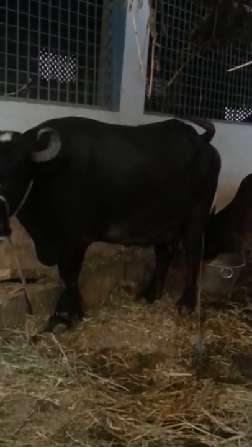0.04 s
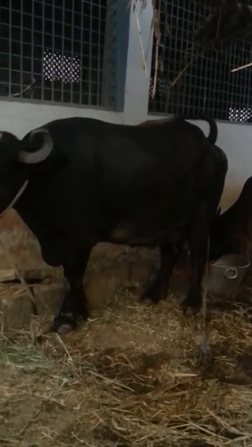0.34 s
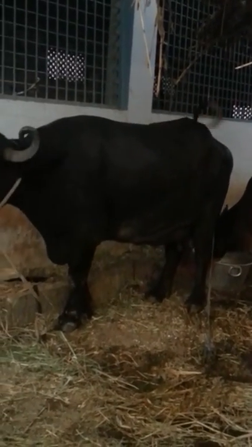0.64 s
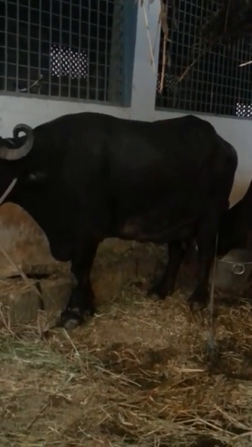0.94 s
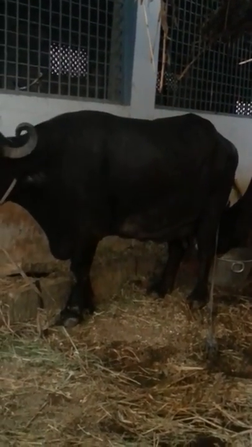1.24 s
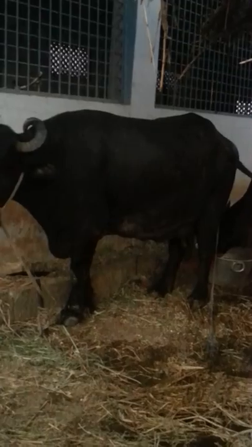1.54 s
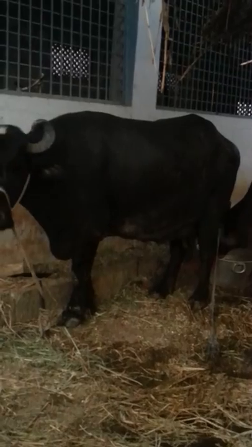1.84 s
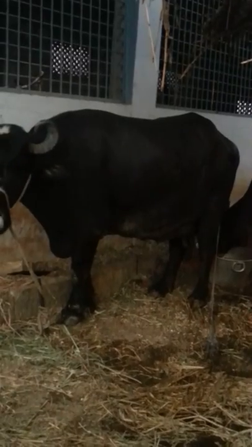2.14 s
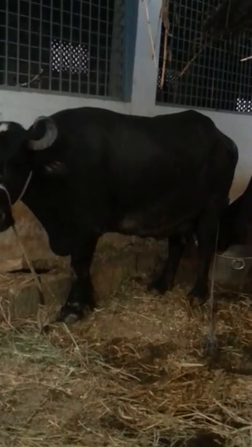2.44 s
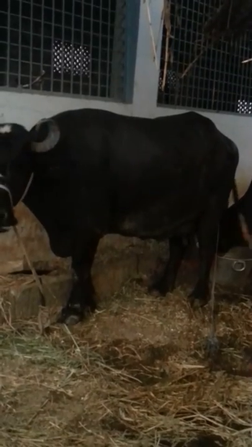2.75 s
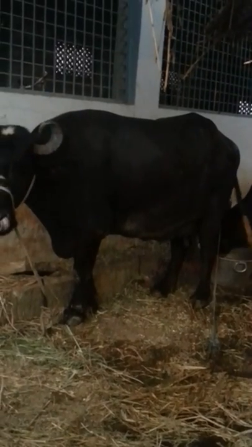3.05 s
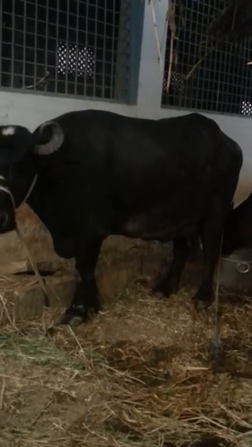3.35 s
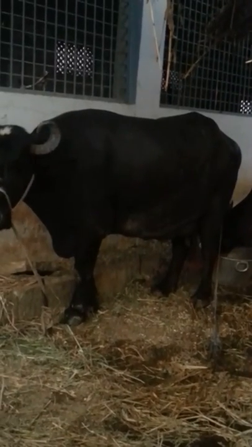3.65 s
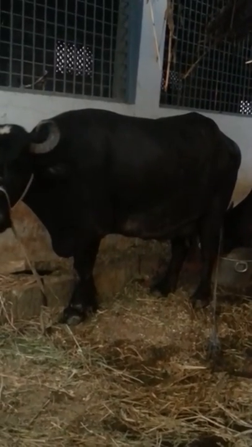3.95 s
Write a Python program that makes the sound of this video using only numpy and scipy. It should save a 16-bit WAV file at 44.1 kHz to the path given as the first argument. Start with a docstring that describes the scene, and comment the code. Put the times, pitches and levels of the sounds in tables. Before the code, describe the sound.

Small birds, probably sparrows, chatter throughout in an echoing cattle shed, mostly to the left, near chirps standing out of the crowd and fading after 3.6 seconds. A low rumble, faint hum and hiss lie beneath. Soft scuffing comes around 0.5 seconds, and a hollow knock at 2.1. Seven sharp electrical pops hit the right side between 0.3 and 1.3 seconds, with another at 3.5.

```python
"""Birds in a cattle shed

A flock of small birds, probably sparrows, chatters between hard walls, mostly to the left.
Each chirp is a short, bending whistle; near ones stand out of the echoing crowd.
Under them lie a low rumble, a faint hum and hiss, some scuffing and one hollow knock.
Eight sharp electrical pops, sudden steps in voltage, hit the right channel only."""
import sys
import numpy as np
from scipy import signal
from scipy.fft import rfft, irfft, next_fast_len
from scipy.io import wavfile
from scipy.ndimage import uniform_filter1d, map_coordinates

SR = 44100
rng = np.random.default_rng(int(sys.argv[2]) if len(sys.argv) > 2 else 0)


def persist_wave(psi):
    """Save psi, clipped to +-1, as 16-bit WAV."""
    counts = np.round(np.clip(psi, -1, 1) * 32767).astype(np.int16)
    wavfile.write(sys.argv[1], SR, np.atleast_2d(counts).T)


N = 176400  # 4 seconds

# how long the shed's echo takes to fade by 60 dB: f/Hz, fade time/s
ECHO_FADE = [(300, 0.08), (2000, 0.41), (5000, 0.34), (10000, 0.13)]
# tone of the rumble: f/Hz, relative level/dB
RUMBLE_TONE = [(20, -23), (40, -12), (75, -9), (130, -3.5), (220, -1.5), (290, 1.5), (450, -6.5),
               (700, -10.5), (1200, -13.5), (2500, -13.5), (6000, -88)]
# how the rumble swells and sinks: t/s, relative level/dB
RUMBLE_SWELL = [(0.0, -44), (0.46, -44.5), (1.51, -51), (2.37, -48), (4.0, -49.5)]
# how alike the rumble is left and right: f/Hz, likeness (1 = the same)
RUMBLE_LIKENESS = [(60, 0.66), (250, 0.93), (700, 0.44), (2000, 0.16)]
# notes of the hum: f/Hz, level/dB
HUM_NOTES = [(75.4, -63.5), (220.7, -56), (286, -60), (322, -60.5)]
# tone of the hiss: f/Hz, relative level/dB
HISS_TONE = [(2000, -37), (5000, -2.5), (8000, -4), (10000, -9.5), (13000, -22.5), (14500, -41),
             (15600, -45)]
# taps and scrapes on the floor: t/s, rise/s, 60 dB fade/s, level/dB, f/Hz, Q (high = squeaky)
FLOOR_SCUFFS = [(0, 0.037, 0.91, -45, 620, 8), (0.459, 0.042, 0.81, -42.5, 350, 0.32),
                (.48, 0.035, 1, -41.5, 780, 1.9), (.5, .09, .5, -46, 953, 36),
                (2.076, .001, 0.028, -38.5, 1900, 0.97), (2.077, 0.0034, 0.23, -38, 680, 1.6),
                (2.85, 0.0065, 0.19, -43.5, 660, 1.3), (3.762, 0.0034, 0.056, -44.5, 1430, 1.6)]
# ringing notes of the hollow knock: f/Hz, relative level/dB, 60 dB fade/s
KNOCK_NOTES = [(394, -2, 0.11), (770, 5.5, 0.061), (867, -0.5, .08)]
# voltage steps behind the pops: t/s, level before filtering/dB
VOLTAGE_STEPS = [(0.3452, -7), (0.7073, -8.5), (0.8734, -6.5), (1.0471, -10.5), (1.0792, -6.5),
                 (1.2356, -3.5), (1.2840, -5), (3.4515, -2.5)]
# how the crowd and the far birds swell and sink together: t/s, relative level/dB
FLOCK_SWELL = [(0.0, -27.5), (0.12, -31.5), (0.29, -25.5), (0.34, -26), (0.7, -26), (0.76, -32.5),
               (0.9, -28), (1.11, -25), (1.28, -32.5), (1.32, -23.5), (1.59, -29), (1.65, -30),
               (1.69, -28.5), (1.95, -35), (1.97, -31), (2.06, -33), (2.18, -26.5), (2.22, -32.5),
               (2.32, -26), (2.36, -30.5), (2.87, -25), (2.97, -31), (3.2, -31.5), (3.28, -32.5),
               (3.41, -30.5), (3.49, -26.5), (3.67, -37), (4.0, -40.5)]
# tone of the far birds: f/Hz, relative level/dB
FAR_TONE = [(590, -58), (1000, -69), (1390, -19), (1940, -9), (2260, -13), (2530, -12), (3780, 2.5),
            (4920, -29.5), (5920, -10.5), (6710, -3), (7700, -6), (8250, -13.5), (13700, -41.5),
            (14800, -79), (15500, -88)]
# tone of the near and crowd chirps where the listener stands: f/Hz, gain/dB
CHIRP_TONE = [(1000, -18), (2500, -1), (3200, 1.5), (4000, 1.5), (5300, 5.5), (7500, 8.5), (9000, 3),
              (11000, -5), (14000, -21)]
# extra lean of all the birds to one side: f/Hz, left minus right/dB
BIRD_BALANCE = [(1000, 7), (2000, 7.5), (4000, 1), (5300, 1.5), (6300, 1), (7300, -9.5), (9000, -10),
                (12000, -19)]
# near chirps: t/s, length/s, opening f/Hz, middle f/Hz, closing f/Hz, relative level/dB,
# roughness (0 = a clean whistle)
NEAR_CHIRPS = [ (-.02, 0.066, 4800, 4000, 3440, -28, 0.76), (0.125, 0.015, 5540, 6500, 6700, -37, 0),
               (0.156, 0.037, 4770, 4900, 5000, -31.5, 0.54), (0.198, 0.03, 7400, 7000, 6000, -33.5, 0.94),
               (0.226, 0.062, 5600, 5600, 5170, -29, 0.72), (0.245, 0.034, 4900, 4520, 4300, -27.5, 0.68),
               (0.287, 0.027, 4270, 4570, 4800, -30, .2), (0.267, 0.038, 3950, 3930, 3980, -24, 0.5),
               (0.302, 0.056, 5200, 5110, 5080, -34.5, 0.08), (0.384, 0.019, 3810, 3686, 3340, -26.5, 0.01),
               (0.407, 0.11, 5550, 4770, 3320, -31, 1.25), (0.547, 0.052, 6500, 5170, 3930, -32.5, 0.62),
               (0.574, 0.084, 4673, 3770, 2740, -29.5, 0.87), (0.625, 0.038, 7400, 7570, 7320, -38, 0.4),
               (0.634, .11, 5310, 3936, 3420, -30.5, 0.82), (0.783, 0.073, 5400, 4195, 3410, -30.5, 1.19),
               (0.885, 0.022, 5390, 6200, 6680, -31.5, 0.65), (0.897, 0.039, 4650, 4740, 4490, -30.5, 0.9),
               (0.912, 0.028, 5590, 5570, 4900, -28.5, 0.56), (0.976, 0.021, 4770, 4950, 4870, -23.5, 1.1),
               (1.023, 0.02, 5230, 5950, 6140, -40, .7), (1.07, 0.027, 4860, 4900, 5000, -27, 0.1),
               (1.074, 0.087, 4610, 3756, 2970, -35, 0.65), (1.202, 0.044, 7950, 7170, 6650, -29, 0.38),
               (1.32, 0.058, 5600, 4640, 4560, -31.5, 0.77), (1.377, 0.16, 5400, 4000, 3720, -32, 0.88),
               (1.474, 0.04, 4850, 6710, 8440, -28, 0.62), (1.529, 0.018, 6500, 5580, 4500, -26, .4),
               (1.55, 0.042, 4330, 4026, 3900, -23, 0.22), (1.676, 0.045, 5580, 5260, 4500, -32.5, 0.98),
               (1.742, 0.058, 5200, 4010, 3440, -31, 0.63), (1.835, 0.038, 4920, 5140, 5220, -33, 0.69),
               (1.96, 0.024, 4280, 4480, 5070, -32.5, 0.1), (2.112, 0.046, 4400, 5200, 6300, -41, 0.54),
               (2.157, 0.029, 4830, 4790, 4850, -28.5, 0.04), (2.157, 0.025, 5200, 5100, 5150, -35, 0),
               (2.2, 0.057, 5050, 6230, 7660, -44.5, 0.47), (2.272, 0.059, 6000, 4920, 4210, -32.5, 0.74),
               (2.295, 0.022, 4880, 4970, 4980, -51, 0.17), (2.459, 0.078, 5480, 3900, 3660, -33.5, 0.84),
               (2.579, 0.091, 4700, 4135, 3470, -33, 0.5), (2.679, 0.034, 5440, 5780, 6010, -28.5, 0.83),
               (2.71, 0.1, 5460, 4510, 3940, -29.5, 0.87), (2.793, 0.036, 5850, 5650, 4760, -27, 0.33),
               (2.839, 0.06, 4650, 4870, 5050, -26.5, 0.29), (2.867, 0.03, 6710, 6170, 5830, -33.5, 0.13),
               (2.857, 0.08, 4000, 4030, 3620, -29.5, 0.55), (2.904, 0.012, 6410, 6370, 5950, -28, 0),
               (2.971, 0.039, 4750, 5230, 5200, -33.5, 0.19), (3, .065, 4250, 3694, 3070, -32.5, 0.36),
               (3.12, .05, 5400, 5880, 5400, -44.5, 0.55), (3.136, 0.049, 4170, 3760, 3410, -36.5, 0.75),
               (3.208, 0.054, 4390, 3540, 3020, -40.5, 0.54), (3.294, 0.034, 4750, 5110, 5800, -36.5, 0.27),
               (3.298, .04, 6600, 7000, 7140, -42, 1), (3.346, 0.042, 5150, 4480, 3100, -30, 0.45),
               (3.424, 0.0164, 5400, 5960, 6400, -33.5, 0.3), (3.43, 0.062, 4600, 4560, 3640, -32.5, 0.1),
               (3.495, 0.05, 4810, 3840, 3230, -36.5, 1), (3.568, 0.036, 4110, 3620, 3400, -33.5, 0.54),
               (3.719, 0.061, 3690, 3450, 3580, -41, 0.56), (3.866, 0.049, 4800, 4380, 4120, -44, 0.28),
               (3.9, 0.085, 3500, 3360, 2790, -41, 0.44), (3.971, 0.027, 4920, 5050, 4900, -45, .6)]


def amp(db):
    """Turn decibels into a gain."""
    return 10 ** (np.asarray(db) / 20)


def unit(x):
    """Scale a signal to an average power of 1."""
    return x / np.sqrt(np.mean(x ** 2) + 1e-20)


def along(points, hz):
    """Read between (f/Hz, value) rows on a log frequency axis."""
    f, v = np.transpose(points)
    return np.interp(np.log(hz + 1), np.log(f + 1), v)


def curve(rows):
    """One value per sample from (t/s, value) rows."""
    return np.interp(np.arange(N) / SR, *np.transpose(rows))


def wobble(rate, size=N):
    """A smooth curve through `rate` random values a second."""
    return map_coordinates(rng.standard_normal(size // 8 + 8), [np.arange(size) * rate / SR], mode="wrap")


def filtered(x, response):
    """Give each frequency in x the gain response(hz)."""
    size = next_fast_len(N + SR // 2)
    return irfft(rfft(x, size) * response(np.fft.rfftfreq(size, 1 / SR)), size)[..., :N]


def toned(x, tone):
    """Shape a sound with (f/Hz, gain/dB) rows."""
    return filtered(x, lambda hz: amp(along(tone, hz)))


def pan(db):
    """Left and right gains, the left louder by db, at unchanged power."""
    gains = amp(np.array([[.5], [-.5]]) * db)
    return gains / np.sqrt(np.mean(gains ** 2, axis=0))


def add(track, start_s, sound):
    """Mix a sound into a track, cutting off what sticks out."""
    i = round(start_s * SR)
    part = sound[..., max(-i, 0):max(N - i, 0)]
    track[..., max(i, 0):max(i, 0) + part.shape[-1]] += part


def in_shed(x, echo_db):
    """Hard walls add an echo, new on each use; its middle pitches ring longest."""
    hz, t, noise = signal.stft(rng.standard_normal((2, SR // 3)), SR, nperseg=256)
    fade = amp(-60 * t / along(ECHO_FADE, hz)[:, None])
    tail = signal.istft(noise * fade, SR, nperseg=256)[1]
    response = amp(echo_db) * tail / np.linalg.norm(tail[0])
    response[:, 0] += 1  # the direct sound
    return signal.fftconvolve(x[None], response, axes=1) / np.sqrt(1 + amp(2 * echo_db))


def rumble():
    """Low noise, partly shared by both sides, slowly swells and sinks."""
    def tone_and_width(hz):
        angle = np.arccos(np.clip(along(RUMBLE_LIKENESS, hz), -1, 1)) / 2
        return amp(along(RUMBLE_TONE, hz)) * [np.cos(angle), np.sin(angle)]
    shared, side = filtered(rng.standard_normal((2, N)), tone_and_width)
    return amp(curve(RUMBLE_SWELL) + 1.5) * unit(np.array([shared + side, shared - side]))


def hum(waver_db=1.5, drift_hz=1.3):
    """Faint low notes waver a little in loudness and pitch."""
    out = np.zeros(N)
    for hz, db in HUM_NOTES:
        waver = amp(waver_db * wobble(rate=3.92))
        phase = 2 * np.pi * np.cumsum(hz + drift_hz * wobble(rate=14)) / SR
        out += amp(db) * unit(waver * np.sin(phase))
    return out


def hiss(level_db=-55):
    """Faint, steady, high noise."""
    return amp(level_db) * unit(toned(rng.standard_normal((2, N)), HISS_TONE))


def scuffs():
    """Dull taps and scrapes, probably the cattle shifting: bursts of noise around one pitch each."""
    out, t = np.zeros((2, N)), np.arange(SR // 2) / SR
    for start, rise, fade, db, centre, q in FLOOR_SCUFFS:
        def dull_ring(hz):
            resonance = 1j * hz * centre / (centre ** 2 - hz ** 2 + 1j * hz * centre / q)
            return resonance / (1 + 1j * hz / centre / 2) ** 2  # softens the treble
        noise = unit(filtered(rng.standard_normal(N), dull_ring))
        envelope = np.minimum(t / rise, 1) * amp(db - 60 * np.maximum(t - rise, 0) / fade)
        add(out, start, in_shed(noise[:len(t)] * envelope, echo_db=-3))
    return out


def knock(start_s=2.0765, attack_s=0.0015, gain_db=-35):
    """A soft blow on something hollow, perhaps a trough, rings briefly."""
    out, t = np.zeros((2, N)), np.arange(SR // 4) / SR
    ring = sum(amp(db - 60 * t / fade) * np.sin(2 * np.pi * hz * t) for hz, db, fade in KNOCK_NOTES)
    onset = 1 - np.exp(-t / attack_s)
    add(out, start_s, in_shed(amp(gain_db) * ring * onset, echo_db=-4))
    return out


def pops(leak_hz=40, low_cut_hz=107, q=0.76, top_hz=12700):
    """Voltage steps in the right channel, rounded and pulled back to zero by the input's filters."""
    jumps = np.zeros(N)
    for start, db in VOLTAGE_STEPS:
        jumps[round(start * SR)] = amp(db)
    leaking = signal.lfilter([1], [1, -np.exp(-2 * np.pi * leak_hz / SR)], jumps)
    low_cut = lambda hz: -hz ** 2 / (low_cut_hz ** 2 - hz ** 2 + 1j * hz * low_cut_hz / q)
    right = filtered(leaking, lambda hz: low_cut(hz) / (1 + 1j * hz / top_hz))
    return np.array([np.zeros(N), right])


def far_birds(patchy_db=3, gain_db=-7.5):
    """The farthest voices merge into a patchy wash of echo."""
    noise = signal.stft(rng.standard_normal((2, N)), nperseg=512)[2]
    patches = uniform_filter1d(rng.standard_normal(noise.shape[1:]), size=7, axis=0)  # blur in pitch
    patches = uniform_filter1d(patches, size=8, axis=1)  # blur in time
    wash = signal.istft(noise * amp(patchy_db * unit(patches)), nperseg=512)[1][:, :N]
    return amp(gain_db) * unit(toned(wash, FAR_TONE)) * pan(db=2.5)


def chirp(length, opening, middle, closing, rough, rasp_hz=407.7):
    """A whistle bent through three pitches; roughness shakes its pitch and loudness."""
    size = int(np.clip(length * SR, SR // 100, SR // 6))
    progress = np.linspace(0, 1, size)
    rasp = rough * wobble(rate=750, size=SR // 6)[:size]
    flutter_db = rough * wobble(rate=375, size=SR // 6)[:size]
    glide_hz = np.polyval(np.polyfit([0, .5, 1], [opening, middle, closing], 2), progress)
    phase = 2 * np.pi * np.cumsum(glide_hz + rasp_hz * rasp) / SR
    whistle = np.sin(phase) + amp(-20) * np.sin(2 * phase)  # with a weak overtone
    ramp = np.minimum(progress / 0.17, (1 - progress) / 0.24)  # first 17% fades in, last 24% out
    envelope = np.sin(np.pi / 2 * np.minimum(1, ramp)) ** 2
    return envelope * unit(amp(flutter_db) * whistle)


def crowd(perches=12, calls_per_s=150, typical_hz=4700, typical_s=.032, scatter_db=1.8, gain_db=-5.3):
    """Many birds on several perches give short whistles that mostly rise and then fall further."""
    out, gap_s = np.zeros((2, N)), perches / calls_per_s
    for _ in range(perches):
        voice = np.zeros(N)
        for k, (when, pitch, span, loudness, bend, drop) in enumerate(rng.standard_normal((56, 6))):
            middle = typical_hz * np.exp(.17 * np.clip(pitch, -2, 2))
            opening, closing = middle * (.92 + 0.0797 * bend), middle * (.8 + 0.078 * drop)
            call = chirp(typical_s * np.exp(.3 * span), opening, middle, closing, rough=.33)
            gain = amp(scatter_db * loudness) * typical_hz / middle  # higher calls are softer
            add(voice, (k - 1 + when / 2) * gap_s, gain * call)
        out += in_shed(voice, echo_db=-1)[:, :N]
    return amp(gain_db) * unit(out) * pan(db=8.5)


def near_birds():
    """Each near chirp comes from its own perch, so it gets its own echo."""
    out = np.zeros((2, N))
    for start, length, opening, middle, closing, db, rough in NEAR_CHIRPS:
        call = chirp(length, opening, middle, closing, rough)
        add(out, start, amp(db) * in_shed(call, echo_db=-3))
    return out * pan(db=9)


def scene(left_lag_s=8e-5):
    """Mix it all; the birds reach the two sides with a different tone, the left slightly later."""
    def two_sides(hz):
        lag = np.exp(np.pi * hz * left_lag_s * np.array([[-1j], [1j]]))
        return pan(along(BIRD_BALANCE, hz)) * lag
    swell = amp(curve(FLOCK_SWELL))
    calls = toned(near_birds() + swell * crowd(), CHIRP_TONE)
    birds = filtered(calls + swell * far_birds(), two_sides)
    return birds + rumble() + hum() + hiss() + scuffs() + knock() + pops()


def record(dry):
    """The treble falls away steeply above 15300 Hz."""
    return filtered(dry, lambda hz: 1 / (1 + (hz / 15300) ** 80))


dry = scene()
out = record(dry)
persist_wave(out)
```